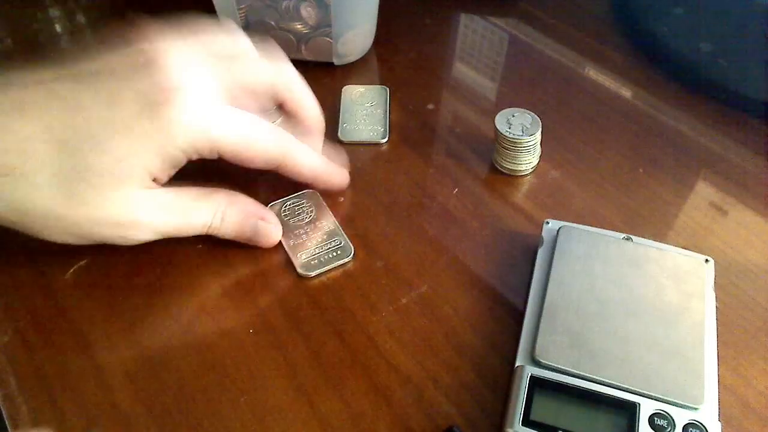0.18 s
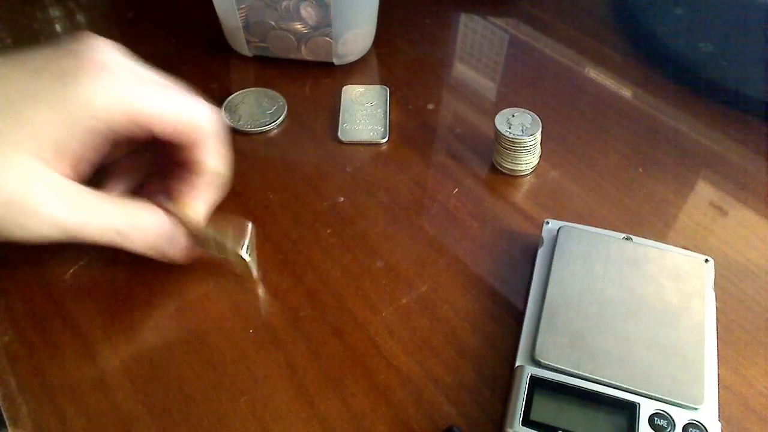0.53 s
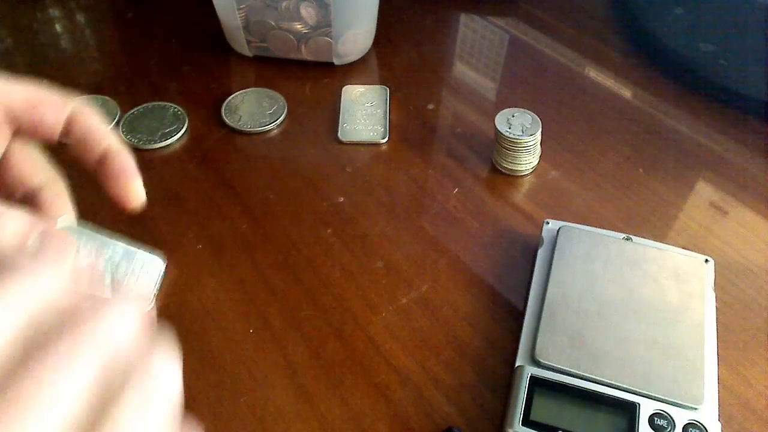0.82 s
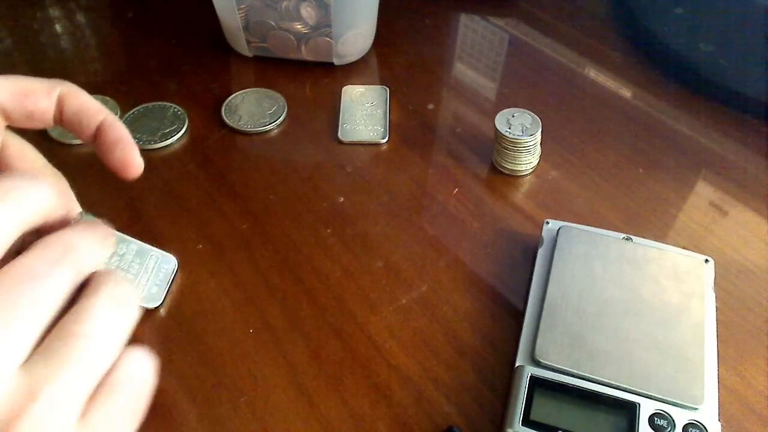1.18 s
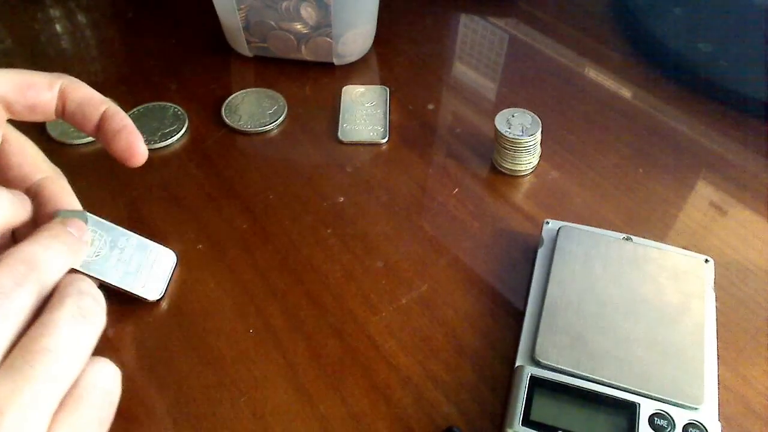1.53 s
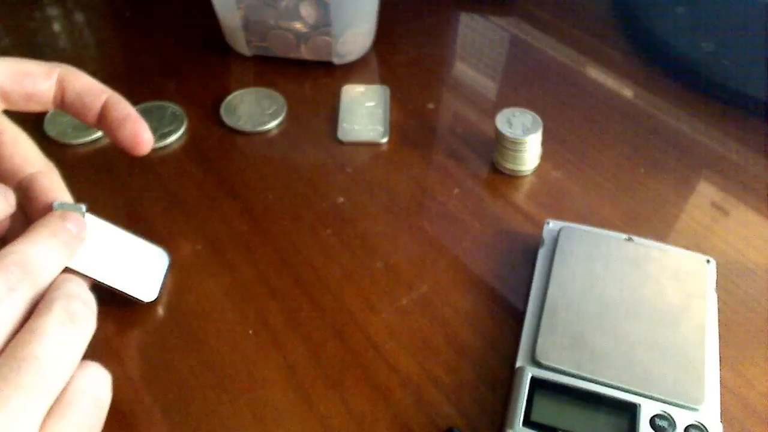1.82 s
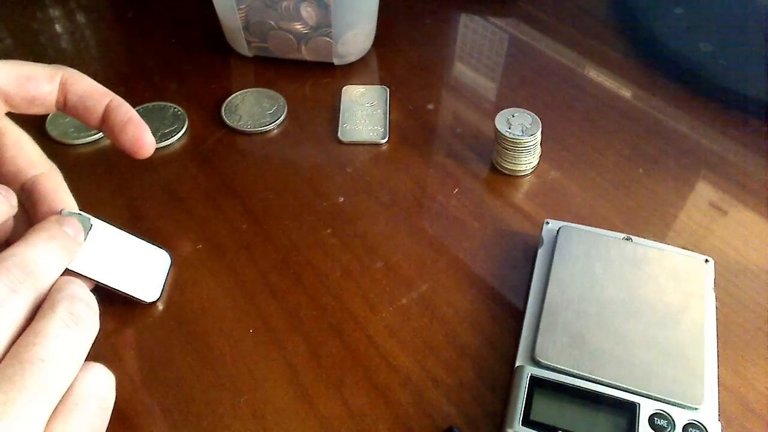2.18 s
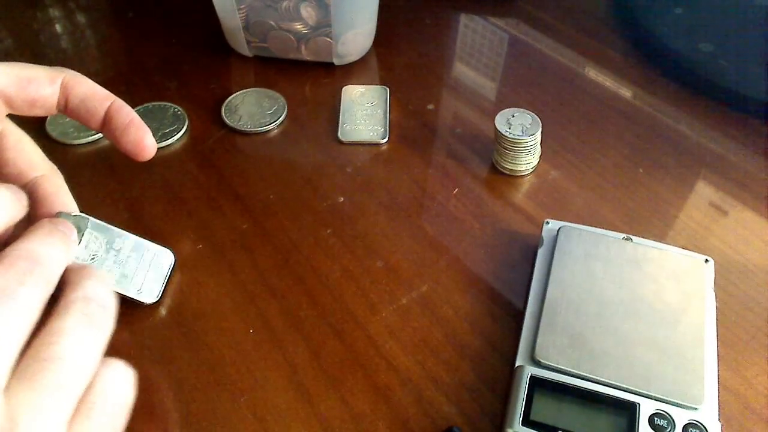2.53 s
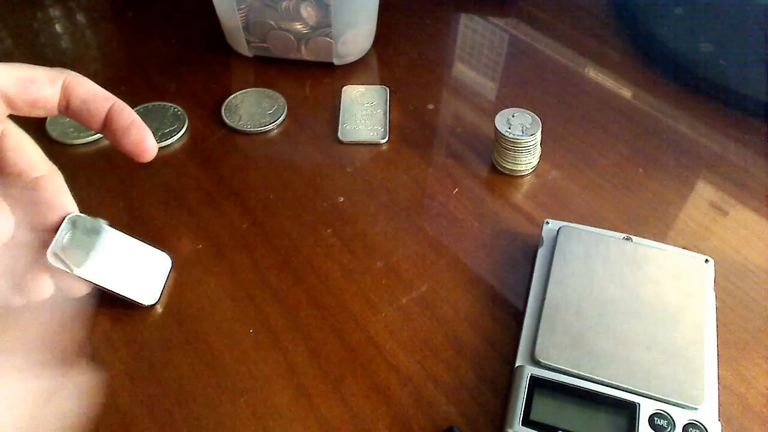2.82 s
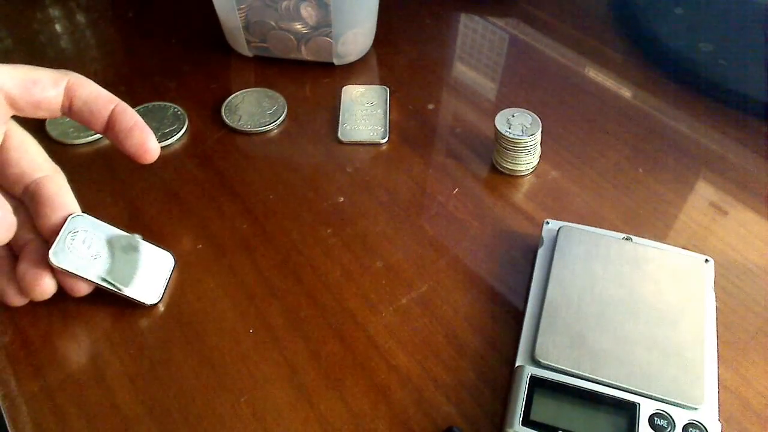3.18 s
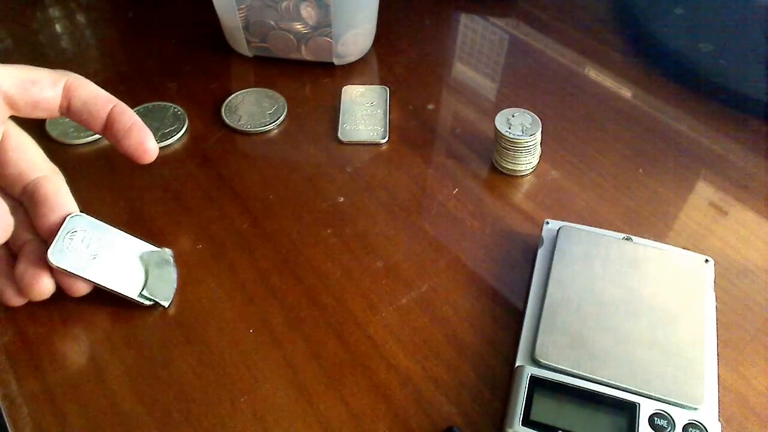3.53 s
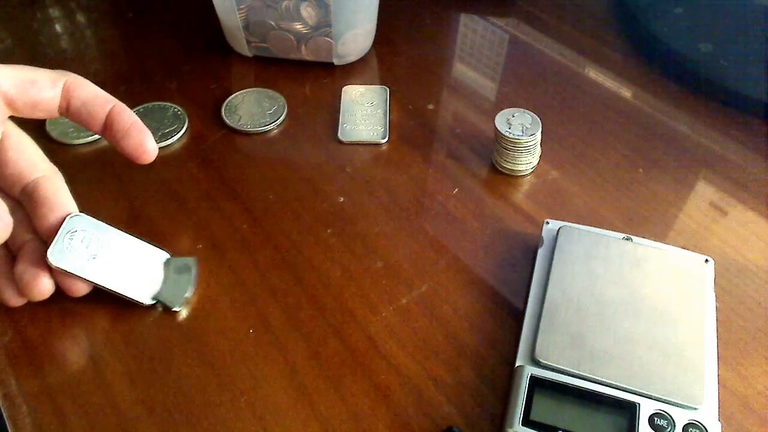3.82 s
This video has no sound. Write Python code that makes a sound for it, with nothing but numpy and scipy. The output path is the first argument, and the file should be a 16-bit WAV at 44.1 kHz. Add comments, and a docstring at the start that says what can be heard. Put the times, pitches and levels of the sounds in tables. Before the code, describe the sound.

A small metal bar clacks sharply on a wooden table, then is handled with lighter clinks

```python
"""Metal bar and magnet on a wooden table

A close microphone hears a small metal bar rattle, slide and knock on wood: noise cracks over dying modes.
The bar is then held while a little magnet clinks on and slides down it: random slips drive resonances.
Soft thumps, low sine bursts, come through the table; the quiet room is filtered noise and a faint hum."""
import sys
import numpy as np
from scipy import signal
from scipy.fft import rfft, irfft
from scipy.io import wavfile
from scipy.ndimage import uniform_filter1d

SR = 44100
rng = np.random.default_rng(int(sys.argv[2]) if len(sys.argv) > 2 else 0)


def decibels_to_gain(level_db):
    """Convert a level in decibels to a linear amplitude gain (20 dB per decade)."""
    exponent = np.asarray(level_db, float) / 20
    return 10 ** exponent


def log_audio(samples):
    """Write samples as a 16-bit WAV file to the path given in sys.argv[1]."""
    # one column per channel
    frames = np.atleast_2d(samples).T
    # limit to full scale, then quantise
    limited = np.clip(frames, -1, 1)
    pcm = np.round(limited * 32767).astype(np.int16)
    wavfile.write(sys.argv[1], SR, pcm)


N = 176400  # four seconds of samples


def knocks():
    """The bar strikes the table: a crack of contact, then wood and bar ring together."""
    # blows of bar on wood, levels before the gains below: start_s, crack_db, wood_db,
    # ring_db (all bar groups but the fourth), fourth_group_ring_db, crack_tilt_db_per_octave
    blows = [(.0074, 2, -25, -17, -22.5, 0.5), (0.0557, -6, -31, -28, -27.5, 0.5),
             (0.0633, -16.5, -31, -33.5, -35.5, -0.5), (0.0904, -7.5, -37, -28, -28.5, -0.5),
             (0.1163, -12.5, -34, -31, -34, 0), (0.1324, -13.5, -36.5, -39, -45, 0),
             (.5909, -33, -54, -53, -58, -2.5), (.6347, -9.5, -30, -44.5, -49, -1),
             (0.9817, -4, -27, -29, -22.5, 0), (0.9959, -14, -31.5, -44, -44, -1.5),
             (1.3057, -38, -58.5, -60, -62, -3.5), (1.4334, -7.5, -30.5, -31.5, -34, 0),
             (1.4471, -17.5, -35.5, -50.5, -45, -1.5), (2.0494, -38.5, -52.5, -75, -75, -4),
             (2.5, -54.5, -61, -88, -88, -3.5), (2.797, -49.5, -61.5, -85, -90, -5.5),
             (2.8094, -51, -65.5, -87, -90, -3.5)]
    # contact noise of metal on wood: frequency_hz, relative_density_db (per Hz)
    contact_spectrum = [(90, -39.5), (170, -19), (700, -13), (1100, -9.5), (1620, 0), (2100, -8.5),
                        (2840, -5.5), (6110, -11.5), (10600, -11.5), (13400, -10.5), (16300, -26)]
    # modes of the table top: frequency_hz, relative_level_db, t60_s (before the extra late fall)
    wood_modes = [(224, -1, 0.077), (270, -8, 0.088), (444, -4, .07), (639, -6, .06), (790, -3.5, .07),
                  (852, -1.5, .09), (1056, -5, 0.094), (1185, -1.5, .06), (1620, -1.5, .04),
                  (2410, -12.5, .05)]
    out = np.zeros(N)
    for start_s, crack_db, wood_db, ring_db, fourth_db, tilt_db in blows:
        contact = decibels_to_gain(crack_db - 10) * crack(contact_spectrum, 0.022, tilt_db)
        wood = decibels_to_gain(wood_db + 1.5) * onset_evened(ring(wood_modes).sum(0))
        metal = decibels_to_gain(-4.5) * bar(ring_db, ring_db, ring_db, fourth_db, ring_db)
        add(out, start_s, contact + wood + metal)
    return out


def clinks():
    """Metal meets metal in the hand: a click, and the bar rings without the wood."""
    # contacts of metal on metal, levels before the gains below:
    # start_s, click_db, then ring_1_db to ring_5_db for the five bar groups, low to high
    contacts = [(0.297, -58, -90, -85, -85, -84.5, -85), (.3176, -54.5, -92, -87, -86, -85, -85),
                (1.268, -21.5, -28.5, -21.5, -24.5, -18.5, -35), (1.2864, -30, -38, -44, -45, -37, -54),
                (1.4644, -25, -47, -47, -34, -42, -42.5), (2.0348, -31.5, -55, -61, -55, -50.5, -45.5),
                (2.0994, -70, -72, -86.5, -78, -83, -64), (2.17, -70, -71, -85.5, -69, -84.5, -67),
                (2.51, -63, -80, -69.5, -89.5, -90.5, -90), (2.524, -67.5, -81, -79, -90.5, -90, -90),
                (2.9741, -59.5, -55, -64.5, -64.5, -71.5, -80), (3.5603, -70, -59.5, -85, -88, -88, -90),
                (3.5967, -61, -53.5, -66, -76, -77, -81), (3.6146, -17, -50, -55, -56, -58, -57),
                (3.6292, -36.5, -58, -56, -62, -62, -70), (3.8149, -38.5, -54.5, -66, -53, -66, -59),
                (3.8754, -37, -48.5, -58, -61, -63, -72)]
    # contact noise of metal on metal: frequency_hz, relative_density_db (per Hz)
    click_spectrum = [(600, -58), (1200, -39.5), (1600, -10), (2560, 1), (4700, -8), (12200, -10.5),
                      (15600, -16), (16400, -30)]
    out = np.zeros(N)
    for start_s, click_db, *rings_db in contacts:
        click = decibels_to_gain(click_db - 9) * crack(click_spectrum, 0.019)
        add(out, start_s, click + decibels_to_gain(-2.5) * bar(*rings_db))
    return out


def bar(*levels_db):
    """The bar's modes in five groups, low to high, each set to its own level at the onset."""
    # modes of the metal bar: frequency_hz, level_db (relative), t60_s (before the extra late fall)
    bar_modes = [(2680, 0, .04), (2779, -4, .06), (3440, -8.5, .04), (5233, -13.5, .04), (5900, -10, 0.041),
                 (6720, -6, 0.058), (7860, -6, 0.06), (7910, -0.5, 0.039), (9400, -13.5, 0.061),
                 (9820, -0.5, 0.046), (10360, -2.5, .03), (10450, -4.5, .04), (12180, 0, 0.068),
                 (12640, -6.5, .04), (13500, -3.5, .025), (14750, 0.5, 0.035), (15300, -7, .025)]
    # borders between the five groups of modes: frequency_hz
    borders_hz = [4500, 9000, 11200, 13000]
    rows = ring(bar_modes)
    group = np.searchsorted(borders_hz, np.array(bar_modes)[:, 0])
    return sum(decibels_to_gain(db) * onset_evened(rows[group == k].sum(0)) for k, db in enumerate(levels_db))


def ring(modes):
    """Dying sine modes, one per row, each a little off in level and pitch at every blow."""
    swell_s, fall_s, vary_db, detune = 0.0022, 0.098, 3.5, 0.003  # the last two are standard deviations
    hz, db, t60_s = np.array(modes).T[:, :, None]
    t = np.arange(SR // 4) / SR
    chance = rng.standard_normal((len(modes), 2))
    level_db = db + vary_db * chance[:, :1] - 60 * t / t60_s
    late_fall_db = 20 * (t / fall_s) ** 2  # hastens the end of every ring
    tones = np.sin(2 * np.pi * hz * (1 + detune * chance[:, 1:]) * t)
    return decibels_to_gain(level_db - late_fall_db) * tones * (1 - np.exp(-t / swell_s))


def crack(spectrum, t60_s, tilt_db=0):
    """A sharp first contact and a brief, unevenly dying chatter, both in the contact's colour."""
    t = np.arange(SR // 4) / SR
    uneven_db = 3.5 * rng.standard_normal(len(t) // 16 + 1).repeat(16)[:len(t)]
    chatter = rng.standard_normal(len(t)) * decibels_to_gain(uneven_db - 60 * t / t60_s)
    chatter = chatter / np.sqrt(np.mean(chatter[:130] ** 2))
    first = decibels_to_gain(17.0) * (t == 0)
    tilted = [(hz, db + tilt_db * np.log2(hz / 2000)) for hz, db in spectrum]
    return colour(chatter + first, tilted)


def drag():
    """The bar drags over the wood: dense slips drive two moving resonances and a wide hiss."""
    # path of the drag, levels before the gains below:
    # time_s, low_band_db, low_band_hz, high_band_db, high_band_hz, hiss_db
    drag_path = [(0.37, -92, 4090, -90, 10640, -91), (0.396, -72, 3920, -72, 10700, -72.5),
                 (0.414, -75, 3900, -75, 10700, -73), (0.436, -59, 3860, -57, 10800, -68),
                 (0.456, -78, 4420, -74, 10100, -80), (0.474, -60, 4770, -58, 9440, -82),
                 (0.488, -54, 4660, -61.5, 9450, -82), (0.518, -66, 4600, -50, 9400, -56.5),
                 (0.536, -47, 4470, -49, 9480, -51.5), (0.554, -56, 4530, -47, 9440, -50),
                 (0.574, -60, 4510, -51, 9460, -55.5), (0.584, -62, 4440, -62, 9610, -67),
                 (0.596, -53, 4210, -55, 10000, -54), (0.605, -68, 4110, -62, 10100, -64.5)]
    # widths of the two bands: low_width_hz, high_width_hz
    low_width_hz, high_width_hz = (860, 2200)
    # wide hiss of the drag: frequency_hz, relative_density_db (per Hz)
    hiss_spectrum = [(2000, -31), (2800, -9), (4500, 3), (7000, -4), (10000, -0.5), (14000, -3),
                     (16000, -14)]
    on, low_db, low_hz, high_db, high_hz, hiss_db = curve(drag_path)
    slips = grit(8000.0, 2.5)
    low = decibels_to_gain(low_db - 2.5) * twice(slips, low_hz, low_width_hz)
    high = decibels_to_gain(high_db - 2.5) * twice(slips, high_hz, high_width_hz)
    hiss = decibels_to_gain(hiss_db + 5.5) * colour(slips, hiss_spectrum)
    return on * (low + high + hiss)


def magnet_slide():
    """The magnet slides down the bar: slips drive one moving and one fixed low resonance."""
    # path of the slide: time_s, lower_db, lower_hz, upper_db
    slide_path = [ [(2.86, -97.5, 2570, -100), (2.88, -91.5, 2590, -101), (2.892, -65, 2600, -89),
                  (2.912, -75, 2610, -87), (2.922, -89, 2640, -100), (2.958, -77, 2630, -87),
                  (2.978, -50, 2643, -72), (2.996, -65, 2630, -79), (3.006, -67, 2630, -76),
                  (3.016, -52.5, 2610, -65), (3.078, -72, 2670, -62), (3.104, -54, 2700, -67.5),
                  (3.148, -68, 2660, -76), (3.168, -83.5, 2640, -88), (3.234, -77, 2490, -88),
                  (3.246, -60.5, 2510, -100), (3.252, -57.5, 2510, -90), (3.268, -66, 2570, -88),
                  (3.284, -49.5, 2570, -76), (3.314, -78.5, 2590, -87), (3.38, -80, 2670, -91),
                  (3.396, -68, 2650, -101), (3.414, -74.5, 2550, -89.5), (3.446, -62.5, 2510, -88),
                  (3.464, -83, 2560, -101), (3.52, -71, 2790, -78), (3.548, -76.5, 2740, -83),
                  (3.562, -56, 2740, -68), (3.586, -76.5, 2700, -84), (3.59, -66.5, 2720, -81)], ][0]
    on, lower_db, lower_hz, upper_db = curve(slide_path)
    slips = grit(2500.0, 2.5)
    lower = decibels_to_gain(lower_db) * twice(slips, lower_hz, 340)
    upper = decibels_to_gain(upper_db) * twice(slips, 3220, 415)
    return on * (lower + upper)


def bar_song():
    """The bar sings as the slide begins: denser slips drive its higher tones and a hiss."""
    # path of the singing: time_s, high_db (higher tones and hiss), middle_db (lower tones)
    song_path = [(2.87, -100, -101), (2.892, -66, -87), (2.912, -63.5, -77), (2.936, -74, -88),
                 (2.98, -66, -64.5), (3.006, -88, -85), (3.026, -86, -82), (3.048, -95, -94),
                 (3.092, -93, -88), (3.102, -84, -77), (3.14, -88, -93.5)]
    # tones sung, a middle and a high list: frequency_hz, width_hz, level_db (relative within the list)
    sung_tones = [(5900, 300, -1.5), (6600, 140, -1.5), (7900, 200, -12)], [(9950, 150, -4.5),
                  (10500, 80, 1.5), (12700, 100, -3), (14650, 120, -11)]
    # hiss joined to the high tones: frequency_hz, relative_density_db (per Hz)
    song_hiss = [(8000, -30), (9000, -3), (11000, 1), (14000, -5), (16000, -15)]
    on, high_db, middle_db = curve(song_path)
    slips = grit(6000.0, 2.5)
    middle, high = (evened(sum(decibels_to_gain(db) * twice(slips, hz, width_hz) for hz, width_hz, db in tones))
                    for tones in sung_tones)
    high = evened(high + decibels_to_gain(1.5) * colour(slips, song_hiss))
    return on * (decibels_to_gain(middle_db) * middle + decibels_to_gain(high_db) * high)


def grit(per_s, spread_db):
    """Friction as random slips of uneven size, at a mean rate per second."""
    slips = rng.standard_normal(N) * (rng.random(N) < per_s / SR)
    size_db = spread_db * np.minimum(rng.exponential(1, N), 4)
    return evened(slips * decibels_to_gain(size_db))


def thumps():
    """Soft blows through the table: its lowest mode with a slower push at half the pitch."""
    # thumps: centre_s (the sound starts 8 ms earlier), level_db (before the gain below), pitch_hz
    soft_blows = [(0.243, -62, 164), (0.298, -67, 161), (0.491, -49.5, 159), (0.725, -58, 158.4),
                  (0.849, -52, 162), (1.186, -54, 166), (1.595, -45.5, 156), (1.669, -51.5, 164.6),
                  (1.791, -58, 172.5), (1.893, -48.5, 158), (2.3, -57, 150), (2.794, -47, 161),
                  (2.874, -46.5, 158), (3.137, -42.5, 156), (3.22, -54.5, 153.5), (3.68, -51.5, 164),
                  (3.875, -53.5, 157)]
    lead_s, rise_s, fall_s = 0.008, 0.017, 0.015
    out, t = np.zeros(N), np.arange(SR // 8) / SR
    shape = (1 - np.exp(-(t / rise_s) ** 2)) * np.exp(-t / fall_s)
    for centre_s, level_db, pitch_hz in soft_blows:
        mode = np.sin(2 * np.pi * pitch_hz * t)
        push = decibels_to_gain(-17) * np.sin(np.pi * pitch_hz * t)
        add(out, centre_s - lead_s, decibels_to_gain(level_db + 12) * shape * (mode + push))
    return out


def room(x):
    """Reflections as sparse taps of random sign, each band dying at its own speed."""
    # decay of the room: frequency_hz, t60_s (before the extra fall)
    decay = [(200, 0.3), (800, .22), (2500, 0.25), (6000, 0.22), (12000, 0.13), (16000, .14)]
    # extra fall of the tail: frequency_hz, fall_s (20 dB further down at this time; its sign has no effect)
    extra_fall = [(300, -0.1), (3000, 0.16), (8000, 0.2), (16000, 0.05)]
    taps = np.zeros(SR // 4)
    at = np.arange(200, len(taps) - 20, 20)
    taps[at + rng.integers(0, 20, len(at))] = rng.choice([-1.0, 1.0], len(at))
    hz, t, z = signal.stft(taps, SR, nperseg=256)
    decay_db = -60 * t / read(decay, hz)[:, None]
    extra_db = -20 * (t / read(extra_fall, hz)[:, None]) ** 4
    tail = signal.istft(z * decibels_to_gain(decay_db + extra_db), SR, nperseg=256)[1]
    return signal.fftconvolve(x, tail / np.linalg.norm(tail))[:N]


def room_air():
    """The quiet room as steady noise in a fixed spectrum."""
    # room air: frequency_hz, relative_density_db (per Hz)
    air_spectrum = [(20, -50), (50, -28), (90, -14), (150, -6.5), (220, -9), (400, -9.5), (700, -14),
                    (950, -14.5), (1400, -19), (2000, -21), (2700, -24.5), (3500, -31), (8000, -36),
                    (15500, -40), (16300, -50)]
    hz = np.fft.rfftfreq(N, 1 / SR)
    air = irfft(rfft(rng.standard_normal(N)) * decibels_to_gain(read(air_spectrum, hz)), N)
    return decibels_to_gain(-68) * evened(air)


def hum():
    """Faint wavering tones: narrow resonances driven by one noise."""
    # hum tones: frequency_hz, width_hz, level_db (rms)
    hum_tones = [(161, 25, -70.5), (271.3, 9.2, -70), (359.6, 8, -73.5), (968, 60, -80), (1827, 20, -84.5),
                 (7330, 15, -94.5), (10500, 15, -101), (14680, 15, -101)]
    drive = rng.standard_normal(N)
    return sum(decibels_to_gain(db) * twice(drive, hz, width_hz) for hz, width_hz, db in hum_tones)


def resonate(x, hz, width_hz):
    """A one-pole resonance of gain 1 that follows the pitch hz, by shifting it to zero and back."""
    turn = np.exp(2j * np.pi * np.cumsum(hz * np.ones(len(x))) / SR)
    r = np.exp(-np.pi * width_hz / SR)
    return 2 * (turn * signal.lfilter([1 - r], [1, -r], x / turn)).real


def twice(x, hz, width_hz):
    """The same resonance twice over for steeper skirts, at an rms of 1."""
    return evened(resonate(resonate(x, hz, width_hz), hz, width_hz))


def colour(x, spectrum):
    """Causal minimum-phase filter of unit energy with the given spectrum, floored at -80 dB."""
    level_db = read(spectrum, abs(np.fft.fftfreq(4096, 1 / SR)))
    log_gain = np.log(decibels_to_gain(np.maximum(level_db, -80)))
    taps = np.fft.ifft(np.exp(np.conj(signal.hilbert(log_gain)))).real[:2048]
    return signal.oaconvolve(x, taps / np.linalg.norm(taps))[:len(x)]


def curve(rows):
    """A soft-edged on/off gate for a path's time span, then its columns at every sample."""
    t, rows = np.arange(N) / SR, np.array(rows)
    inside = 1.0 * (t > rows[0, 0]) * (t < rows[-1, 0])
    return [uniform_filter1d(inside, size=300)] + [np.interp(t, rows[:, 0], c) for c in rows.T[1:]]


def read(points, hz):
    """Values of a frequency table at hz, interpolated along log frequency."""
    f, value = np.transpose(points)
    return np.interp(np.log(hz + 1), np.log(f + 1), value)


def evened(x):
    """Scales a sound to an rms of 1 over its whole length."""
    return x / np.sqrt(np.mean(x ** 2) + 1e-20)


def onset_evened(x):
    """Scales a sound to an rms of 1 over its first 400 samples, about 9 ms."""
    return x / np.sqrt(np.mean(x[:400] ** 2) + 1e-20)


def add(mix, start_s, sound):
    """Lays a sound into the mix at its time, cut at the mix's end."""
    part = mix[max(round(start_s * SR), 0):][:len(sound)]
    part += sound[:len(part)]


def scene():
    """Bar and magnet close by with their room echo, over table thumps, air and hum."""
    low_cut = signal.butter(3, 154, "high", fs=SR, output="sos")  # Hz, on the hits alone
    hits = signal.sosfilt(low_cut, knocks() + clinks())
    near = hits + drag() + magnet_slide() + bar_song()
    return (near + decibels_to_gain(-13.5) * room(near) + thumps() + room_air() + hum())[None]


def roll_off(x):
    """The treble ends steeply here."""
    return signal.sosfilt(signal.butter(12, 16450, fs=SR, output="sos"), x)


def record(dry):
    """The recorder clips overloads at full scale and limits the band to 20 kHz."""
    low_pass = signal.firwin(255, 20000, window=("kaiser", 9), fs=SR)
    mix = signal.oaconvolve(np.clip(dry, -1, 1), low_pass[None], "same")
    return roll_off(mix)


dry = scene()
out = record(dry)
log_audio(out)
```